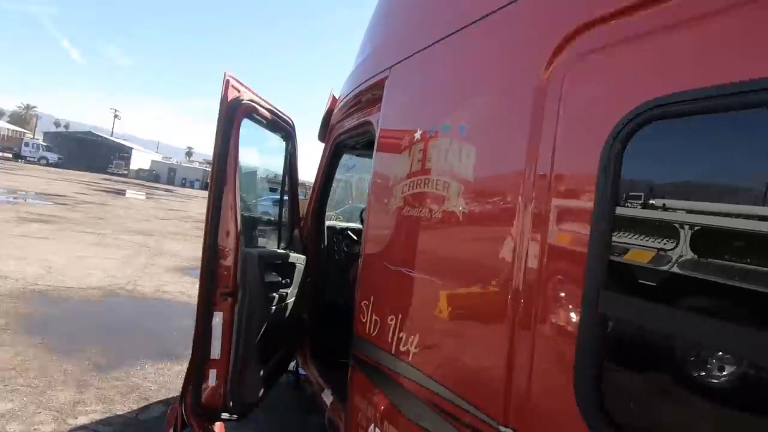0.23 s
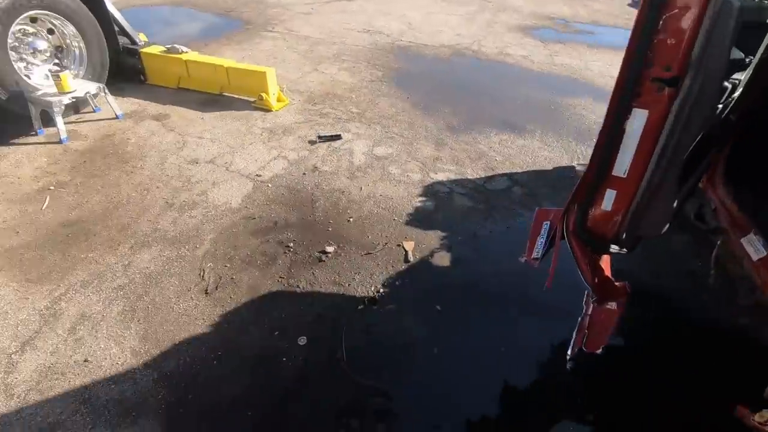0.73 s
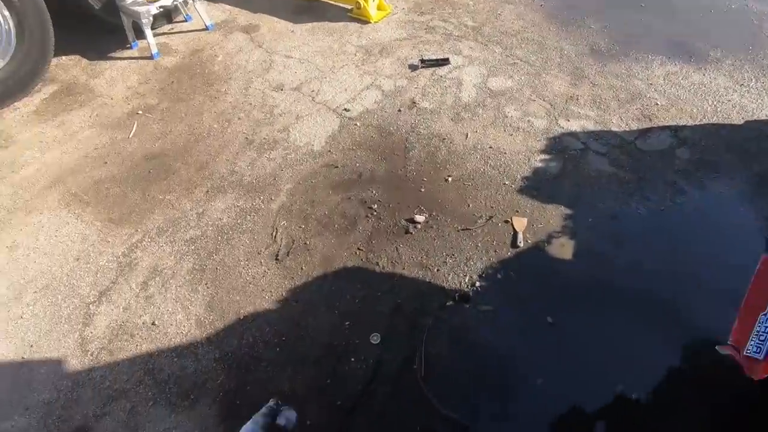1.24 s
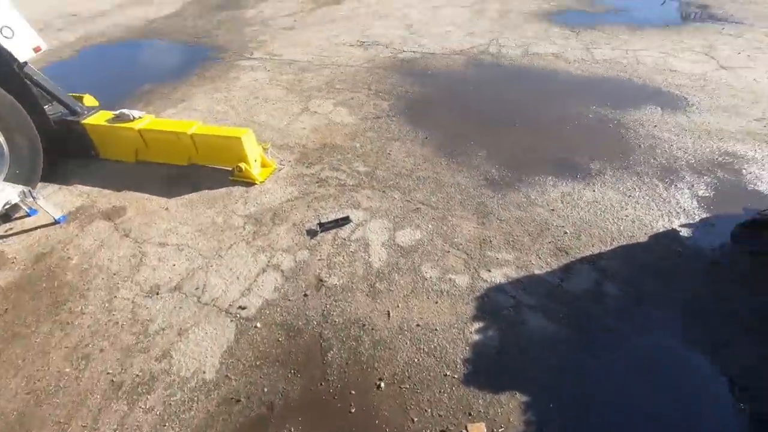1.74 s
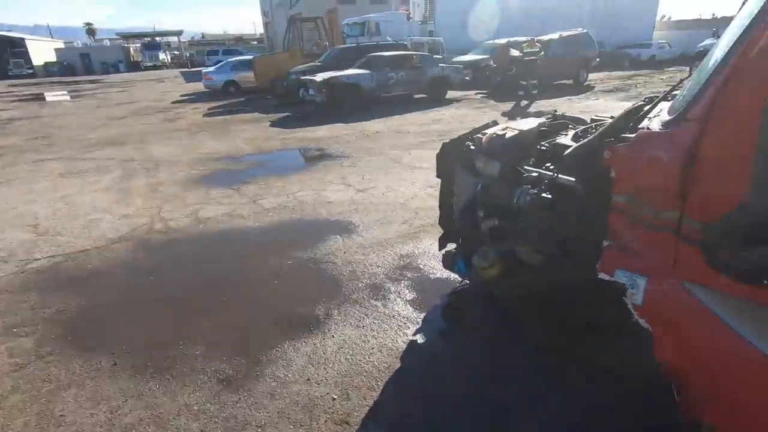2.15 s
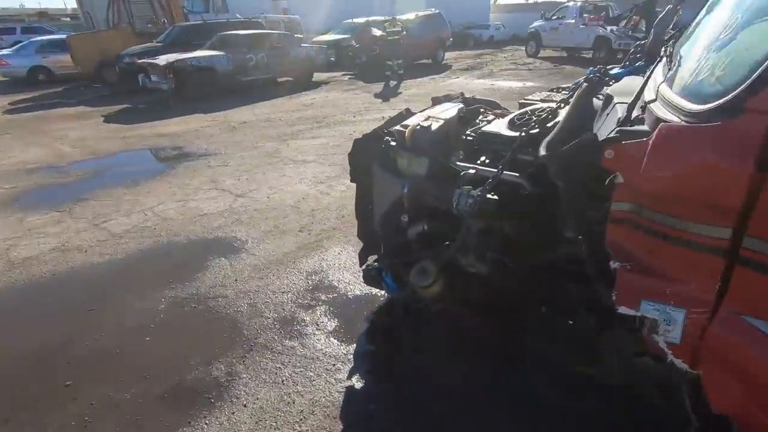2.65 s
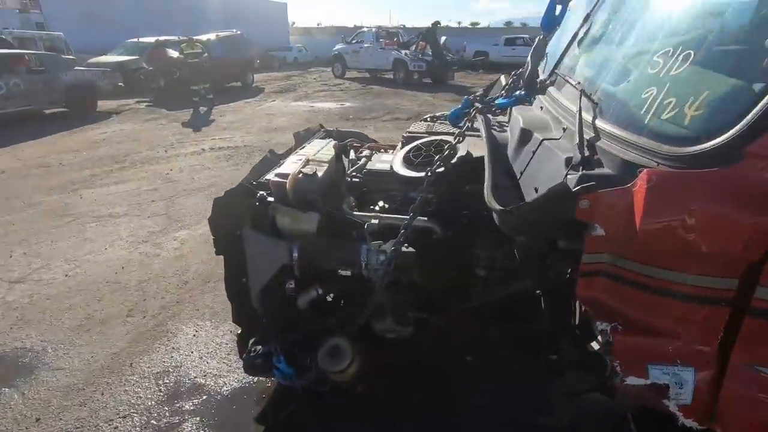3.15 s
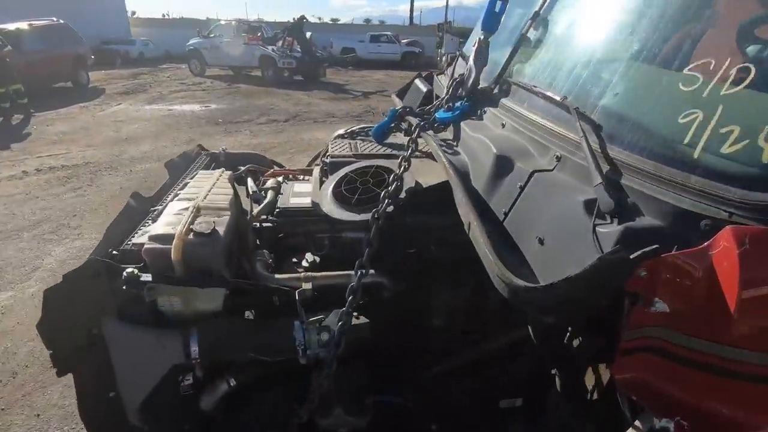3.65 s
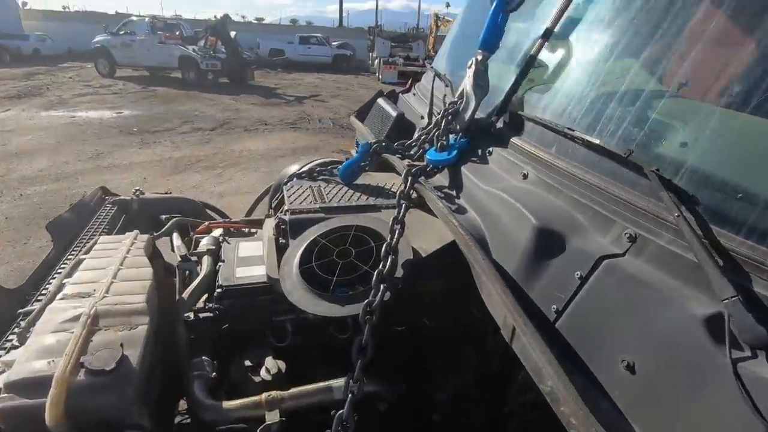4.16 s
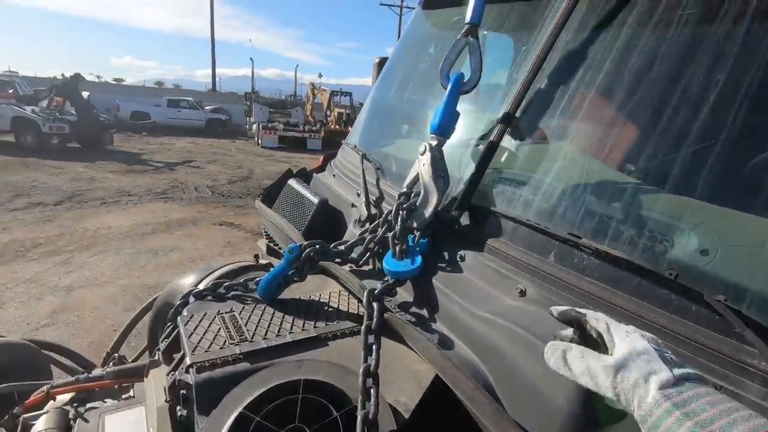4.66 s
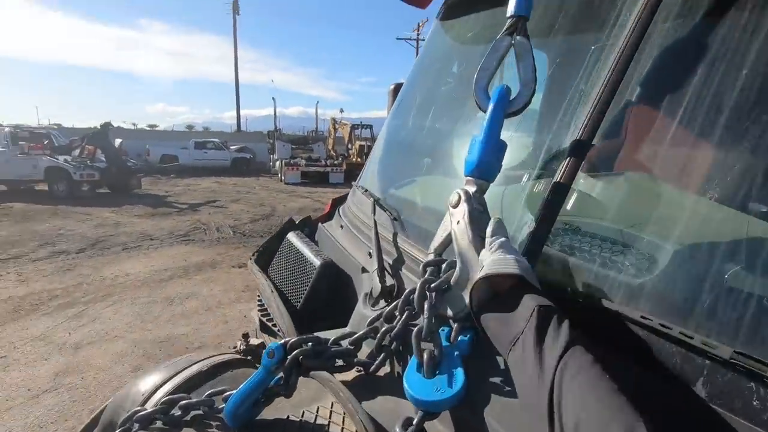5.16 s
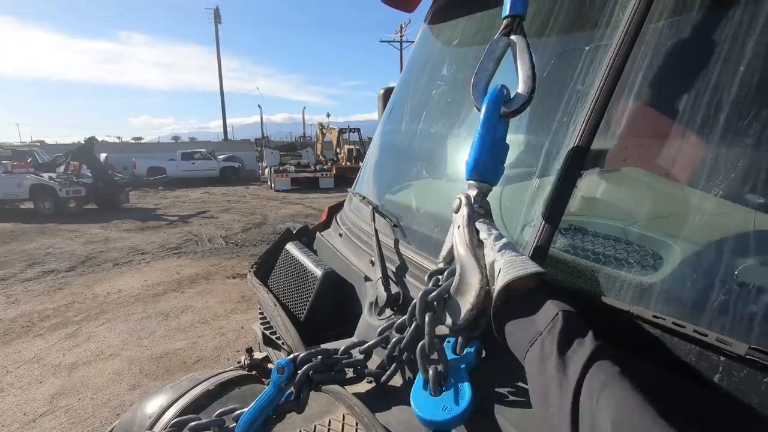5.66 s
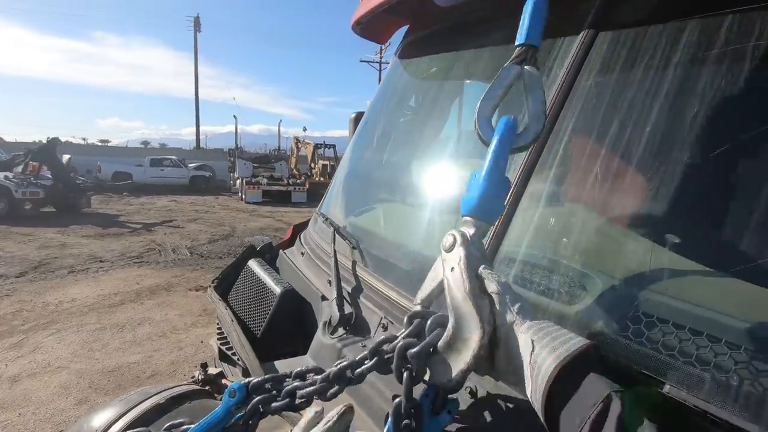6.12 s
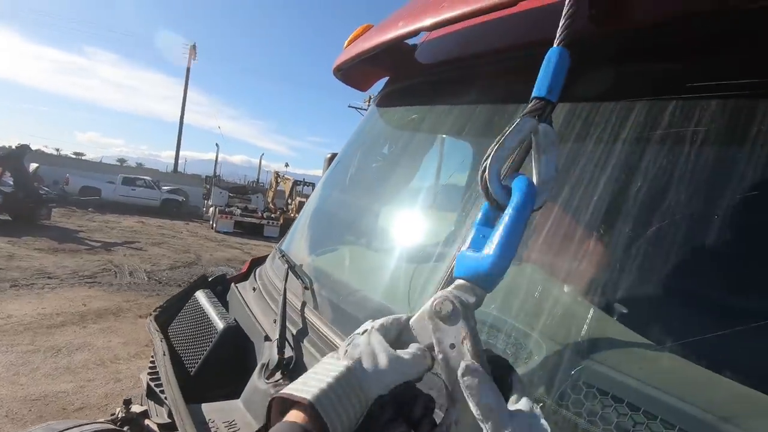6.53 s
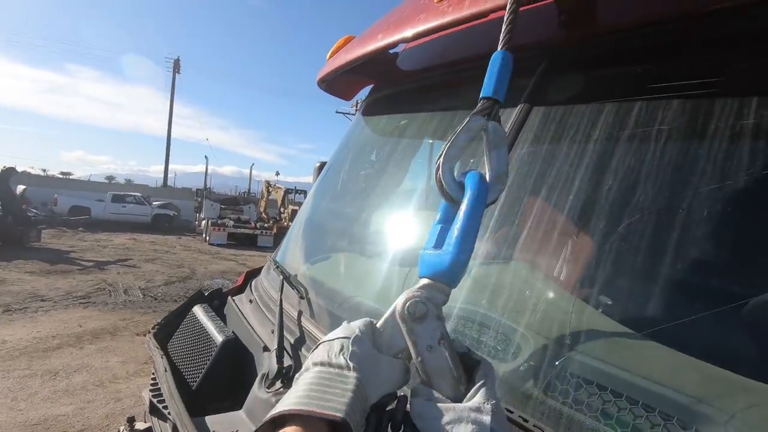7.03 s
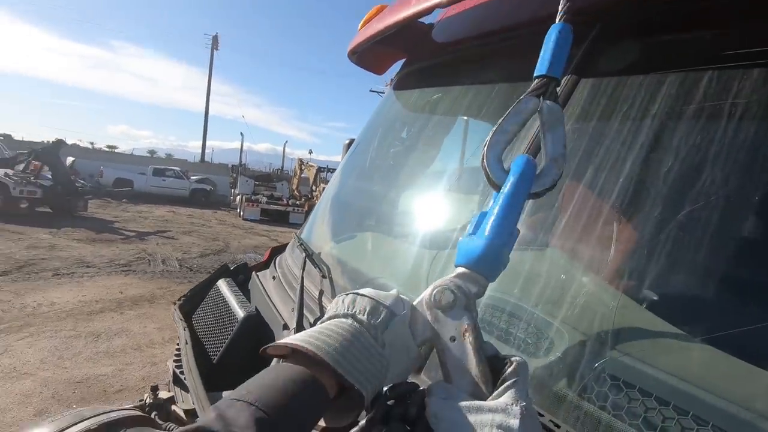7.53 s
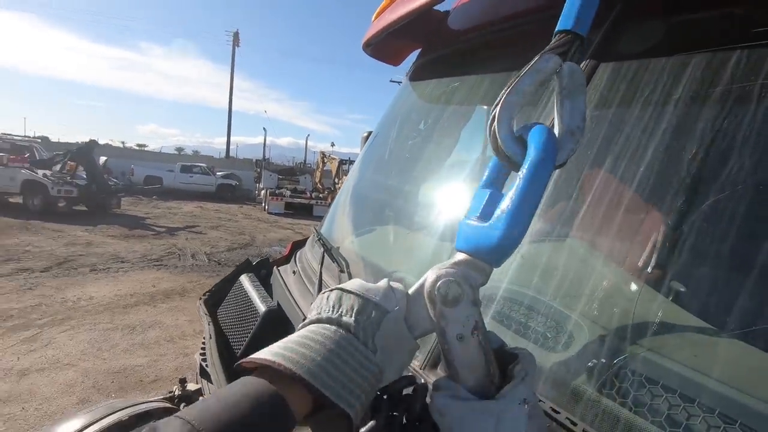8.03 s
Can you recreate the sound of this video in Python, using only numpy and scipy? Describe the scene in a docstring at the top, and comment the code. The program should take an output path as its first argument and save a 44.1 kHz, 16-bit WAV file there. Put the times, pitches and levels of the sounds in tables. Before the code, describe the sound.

A heavy truck diesel idles steadily with a pulsing throb and faint pump whine while chain and hook knock and clink close by in an open yard.

```python
"""A six-cylinder diesel idles in an open yard and drives a hydraulic gear pump: sine orders of the engine
cycle make its throb and whine, noise pulsed by every firing its block roar and fan hiss.
Close by, chain and hook knock and clink as noise bursts, among dull bumps, pops and thin brief tones.
A body-worn camera hears it in stereo, fades to a single duller microphone for a while and fades back.
Wind buffets the microphone ports as lumpy low noise, under faint hiss and noise at the top of the band."""
import sys
import numpy as np
from scipy import signal
from scipy.fft import rfft, irfft, next_fast_len
from scipy.io import wavfile
from scipy.ndimage import uniform_filter1d, map_coordinates

SR = 44100
rng = np.random.default_rng(int(sys.argv[2]) if len(sys.argv) > 2 else 0)


def generate_wav(signal):
    """Clip the signal to [-1, 1] and save it as 16-bit WAV at the path in sys.argv[1]."""
    frames = np.transpose(np.atleast_2d(signal))
    scaled = np.clip(frames, -1, 1) * 32767
    pcm = np.round(scaled).astype(np.int16)
    wavfile.write(sys.argv[1], SR, pcm)


N = 365148

# Exhaust orders. Each row: multiple of the four-stroke cycle, level in dB against the strongest.
EXHAUST_ORDERS = [(9, -16.5), (11, -31), (12, 0), (13, -29), (15, -23), (18, -16.5), (20, -32), (22, -25),
                  (24, -24), (26, -25), (41, -39), (53, -36)]
# Pump and gear whine. Each row: multiple of the cycle, relative level in dB.
WHINE_ORDERS = [(76, -55), (111, -62.5), (118, -51), (120, -50.5), (126, -47), (134, -53.5), (152, -53.5),
                (228, -51.5), (304, -53), (342, -72), (380, -57.5), (386, -69)]
# Strength of each cylinder's firing in dB, in turn.
CYLINDERS_DB = [-6, -6, -3, -5.5, -7.5, -2.5]
# Engine where the wearer stands. Each row: time in seconds, exhaust throb, block roar and fan hiss in dB.
ENGINE_LEVELS = [(0.0, -21.5, -27.5, -45.5), (0.5, -20.5, -25.5, -41.5), (0.62, -20, -26.5, -46),
                 (0.76, -19.5, -26, -47.5), (0.92, -24.5, -29, -49), (1.1, -22.5, -30, -49.5),
                 (1.5, -22.5, -31.5, -46), (2.0, -22, -32, -46.5), (2.5, -22.5, -30, -49),
                 (2.75, -21.5, -31, -50.5), (3.25, -23, -32.5, -51), (3.75, -21, -31.5, -48.5),
                 (4.1, -18.5, -31, -45.5), (4.45, -22, -30.5, -47), (4.75, -17.5, -30, -47.5),
                 (5.0, -22, -32.5, -52.5), (5.5, -18.5, -33, -52), (5.75, -21.5, -32, -50.5),
                 (6.05, -18.5, -30.5, -51.5), (6.3, -26.5, -29.5, -49.5), (6.5, -22, -32.5, -52),
                 (7.0, -21.5, -32.5, -54), (7.7, -20, -31.5, -52), (8.28, -21.5, -30.5, -51)]
# Firing tone where the wearer stands. Each row: time in seconds, level in dB.
FIRING_LEVELS = [(0.0, -21), (0.6, -23.5), (1.3, -28.5), (3.0, -28.5), (3.4, -30), (4.0, -27.5), (5.4, -28),
                 (5.75, -29.5), (6.1, -26.5), (6.3, -34.5), (6.5, -26.5), (7.0, -29), (8.28, -27)]
# Distance from the exhaust beyond that at the start. Each row: time in seconds, distance in metres.
EXTRA_DISTANCE = [(0, 0), (.6, 0), (1.35, -.5), (3, -.3), (3.5, .1), (5.4, .25), (5.75, 1), (7, 1.35),
                  (8.28, 1)]
# Colours of block roar and fan hiss. Each row: frequency in Hz, relative level in dB.
ROAR_COLOUR = [(20, -8.5), (60, 11.5), (120, 4), (170, -3), (250, -6), (330, -10.5), (430, -10),
               (520, -6.5), (620, -3.5), (1000, -8), (1600, -13), (2200, -18), (2900, -24.5), (4000, -35),
               (6000, -59.5)]
HISS_COLOUR = [(1500, -31), (2900, -0.5), (4000, -6.5), (5400, -6), (6600, -4.5), (8000, -9), (9000, -15.5),
               (10000, -25), (11000, -31.5), (12500, -54.5)]
# Bodywork resonances. Each row: centre in Hz, width in Hz, gain in dB.
PANEL_MODES = [(755, 360, 3), (1282, 166, 7), (1984, 340, 5), (5940, 330, 7.5), (7500, 600, 7)]
# Left port against the right for the engine.
# Each row: frequency in Hz, level in dB, phase lead in radians, likeness from 0 to 1.
LEFT_PORT = [(60, -2, -.07, .99), (140, -2.3, -.1, .97), (300, -1.6, -.3, .95), (400, -.5, -.9, .5),
             (470, -4, -2, .2), (600, -10, -3.5, .85), (750, -10.5, -3.7, .97), (1100, -5, -4.05, .96),
             (2100, -8, -4.35, .9), (3500, -4.5, -4.6, .78), (4400, -12, -6, .4), (5300, -9, -8.4, .64),
             (6600, -11.5, -9.1, .7), (8500, -10, -9.1, .55), (10500, -2, -9.2, .3)]
# Extra treble on the left as the wearer turns. Each row: time in seconds, gain in dB.
TURN_TREBLE = [(0.0, 7.5), (0.4, 4), (1.0, 8.5), (3.5, 11), (3.8, 4.5), (4.5, 0.5), (8.28, -1)]

# Colour of the wind on the ports. Each row: frequency in Hz, relative level in dB.
BUFFET_COLOUR = [(15, -18), (30, -12), (55, -9.5), (85, -2.5), (125, 0.5), (170, -15.5), (215, -13.5),
                 (279, -30), (400, -30.5), (520, -72), (880, -120)]
# Gusts at the left port, before colouring. Each row: peak time in seconds, nominal level in dB.
WIND_GUSTS = [(0.42, -39), (0.55, -33), (0.67, -24), (0.9, -46), (1.35, -53), (3.65, -41), (3.87, -42.5),
              (4.42, -47), (4.93, -44), (5.1, -33.5), (5.69, -45), (5.85, -33), (6.49, -26), (6.72, -33),
              (7.42, -45), (7.6, -37.5), (7.75, -33.5), (7.92, -30), (8.25, -25)]

# Colour of the air hiss. Each row: frequency in Hz, relative level in dB.
AIR_HISS_COLOUR = [(5000, -31), (8500, -3.5), (9620, -4.5), (10700, -8.5), (12500, -52), (22000, -120)]
# Colour of the faint noise at 12 to 15 kHz. Each row: frequency in Hz, relative level in dB.
TOP_HISS_COLOUR = [(11000, -30), (12000, -2), (13200, 0), (14500, -3), (15600, -12)]
# Faint noise at 12 to 15 kHz, changing in level. Each row: time in seconds, level in dB.
TOP_HISS_LEVELS = [(0.0, -81.5), (0.5, -69.5), (0.9, -84.5), (1.85, -76), (4.25, -77), (5.4, -91.5),
                   (6.4, -77), (6.75, -83.5), (6.9, -112), (8.28, -112)]

# Dull bumps against the wearer's body. Each row: start in seconds, level in dB before the soft rise, Hz.
BODY_BUMPS = [(0.472, -18.5, 98.3), (0.509, -13.5, 141), (0.527, -9.5, 96.4), (0.54, -13.5, 89.7),
              (0.612, -24, 90), (0.64, -12, 120.4), (0.654, -14.5, 124), (0.671, -14, 128),
              (5.698, -6.5, 103), (6.012, -19, 120), (6.149, -19.5, 98), (6.181, -8, 98.5),
              (6.209, -5.5, 119), (6.295, -16, 97), (6.319, -10, 119.4), (6.342, -13, 109),
              (6.398, -8.5, 100.3), (6.429, -12.5, 102), (6.47, -14.5, 94.4), (6.498, -10, 96.3),
              (6.529, -11.5, 94.4), (6.545, -15, 130), (6.568, -10.5, 127), (6.721, -5, 96.4),
              (8.185, -11.5, 120.5)]
# One bright snap. Each row: start in seconds, relative level in dB, frequency in Hz, 60 dB decay in seconds.
SNAP_PARTIALS = [(.5012, -26, 7800, .004), (.5012, -22, 1400, .005), (.5042, -8, 8200, .003),
                 (.5043, -20, 1000, .006), (.5043, -17, 2000, .005), (.5043, -19, 3000, .004),
                 (.5044, -22, 4200, .004), (.5045, -21, 5300, .003), (.5046, -15, 6500, .003),
                 (.5043, -15, 9600, .003), (.5044, -26, 11000, .003), (.5067, -24, 7800, .012)]
# Thin brief tones. Each row: start in seconds, peak in dB, frequency in Hz.
THIN_TONES = [(4.5844, -43.5, 6400), (5.2644, -46, 6060), (5.77, -43.5, 6260), (5.83, -51, 7000),
              (6.22, -44, 4900), (6.512, -48, 6100), (7.8665, -52, 6500)]
# Sharp pops with a low ring.
# Each row: ring start in seconds, pop peak in dB, pop in Hz, ring level in dB before its rise, ring in Hz.
RINGING_POPS = [(5.575, -21, 504, -43, 301.6), (5.6701, -7.5, 620, -9, 146.6),
                (5.678, -22.5, 520, -24, 496), (5.829, -10, 648, -11, 140.3),
                (6.2675, -19.5, 456, -13, 321), (6.304, -23.5, 500, -26.5, 451),
                (6.373, -18.5, 546, -11, 252), (6.383, -16, 500, -19, 395), (6.394, -21, 600, -21.5, 563),
                (6.498, -27, 497, -24, 444), (6.691, -22, 520, -21, 516), (6.696, -20, 505.4, -23, 329),
                (7.4526, -17, 800, -23, 416), (7.4565, -19.5, 1000, -22, 1040),
                (7.461, -15.5, 600, -32.5, 328), (7.463, -19.5, 750, -27.5, 201),
                (7.472, -20.5, 700, -33, 705), (8.049, -30, 396, -22.5, 319)]
# Very brief faint tones. Each row: start in seconds, level in dB before the rise, 60 dB decay in seconds.
HIGH_BLIPS = [(5.703, -52, 0.054), (5.9745, -50, .012), (5.979, -51, .02)]
# Tones of each blip at 12 and 13 kHz. Each row: frequency in Hz, level in dB against the blip.
BLIP_TONES = [(12000, 0), (13200, -2)]

# Chain and hook contacts, before colouring.
# Each row: start in seconds, then nominal levels of knock, clink and thump in dB.
CHAIN_CONTACTS = [(0.4998, -23, -31.5, -13.5), (0.514, -35.5, -43, -26.5), (0.534, -36.5, -50, -29),
                  (0.566, -25, -54, -33.5), (5.649, -27.5, -56, -26.5), (5.691, -22, -36.5, -33),
                  (5.695, -30, -42, -31.5), (5.704, -37.5, -46, -47), (5.713, -21.5, -40, -34),
                  (5.9722, -41, -31.5, -53.5), (5.9797, -46, -40, -56), (6.189, -28.5, -44, -14),
                  (6.209, -12, -29, -27.5), (6.233, -23.5, -40, -30), (6.238, -24, -43, -28.5),
                  (6.266, -18, -41.5, -25), (6.273, -34, -53, -17.5), (6.299, -27.5, -51, -22),
                  (6.313, -20.5, -36.5, -19.5), (6.334, -20.5, -43, -18.5), (6.342, -22, -47, -24),
                  (6.362, -29.5, -46, -29.5), (6.368, -22, -54, -15.5), (6.393, -17, -31, -18.5),
                  (6.408, -21, -52, -29), (6.448, -18, -36, -28.5), (6.451, -20.5, -38, -29),
                  (6.457, -23, -41.5, -29), (6.474, -20.5, -42, -22), (6.485, -15, -30.5, -29.5),
                  (6.49, -17, -33, -31), (6.494, -21, -43, -32.5), (6.501, -29.5, -50, -25.5),
                  (6.528, -30, -40.5, -22.5), (6.688, -16.5, -31, -29), (6.697, -33, -48, -14),
                  (7.449, -24.5, -44, -30.5), (7.453, -24, -48, -30), (7.46, -27, -56, -26),
                  (7.468, -30, -61.5, -26.5), (8.053, -30, -58, -31.5)]
# Links dragging over each other: start and end in seconds, rise and fall in seconds, mean level in dB.
LINK_SCRAPE = (6.18, 6.52, 0.03, -41.5)
# Colours of knock, clink and thump. Each row: frequency in Hz, relative level in dB.
KNOCK_COLOUR = [(300, -19), (600, -4.5), (1000, -2), (1800, -9), (3000, -20.5), (5000, -35), (9000, -91)]
CLINK_COLOUR = [(1500, -33.5), (3000, 0.5), (5000, -1), (6500, -1.5), (7800, -5), (9000, -15),
                (12000, -25.5), (15000, -46.5)]
THUMP_COLOUR = [(40, -6), (110, 2.5), (190, -2), (300, -9), (600, -16), (1000, -63)]
# Chain link modes. Each row: centre in Hz, width in Hz, level in dB against the direct sound.
LINK_MODES = [(3270, 240, 3), (5120, 290, 2), (6400, 200, 2), (7200, 260, 0.5)]
# Left port against the right for contacts close to the body.
# Each row: frequency in Hz, level in dB, phase lead in radians.
NEAR_LEFT_PORT = [(100, -2, 0), (405, -4, 0.57), (620, -9, -3), (1010, -6, -4.5), (2440, -2.5, -4.5),
                  (5800, -6.5, -8), (12000, -2, -8)]

# Stereo to single microphone: fade start in seconds, stereo return in seconds, both time constants in seconds.
MICROPHONE_SWITCH = (0.63, 3.484, 0.32, 0.47)
# Single microphone response. Each row: frequency in Hz, level in dB, phase lead in radians.
SINGLE_MICROPHONE = [(61, -9, 0.5), (167, -1.5, 1.04), (308, 3, -0.5), (445, 2, -1), (552, -9.5, -0.5),
                     (756, -9, -1.64), (1130, -7.5, -1), (2060, -11, -3), (3000, -13.5, -2),
                     (3600, -15, -5.5), (4480, -3.5, -4.5), (5130, -2, -12), (6536, -14.5, -5),
                     (7700, -20.5, -11.5), (10000, -15.5, -13.5)]

CYCLE_HZ = 5.823  # four-stroke cycle, two crank turns
CRANK_S = 0.01768  # how far into a firing the engine is at the start
PIPE_HZ = 95  # orders above this pipe resonance arrive inverted
WAVER_DB = 1.3  # scale of the firing tone's random wander
BREEZE_DB, GUST_S = -49, 0.064  # mean steady buffeting; gust half-width at 1/e
SHUT_S, OPEN_S = 1.48, 3.55  # low port noise is switched off between these times
AIR_DB = -29.5  # air hiss against the fan hiss
BUMP_T60, RING_CYCLES, THIN_TONE_S = 0.11, 21, 0.027  # s; cycles to fall 60 dB; s
SNAP_LAG_S = 0.00002  # delay at the left port, rounded to a whole sample
KNOCK_T60, CLINK_T60, THUMP_T60 = 0.02, 0.017, 0.06  # s
BLOW_DB, STRIKE_DB = 10.5, 9.5  # first push over the knock and over the clink
CLINK_APART = 0.9  # share of the left clink's power that is its own
TOP_HZ = 15700  # band limit of the camera
T = np.arange(N) / SR


def amp(db):
    """Amplitude ratio of a level in dB."""
    return 10 ** (np.asarray(db) / 20)


def unit(x):
    """x scaled to an rms of one."""
    return x / np.sqrt(np.mean(x ** 2) + 1e-20)


def along(points, hz, column=1):
    """One column of a table by frequency, on a log axis."""
    rows = np.transpose(points)
    return np.interp(np.log(hz + 1), np.log(rows[0] + 1), rows[column])


def curves(rows):
    """One value per sample for each column after the time."""
    s, *cols = np.transpose(rows)
    return [np.interp(T, s, c) for c in cols]


def wobble(rate):
    """A smooth random curve, rate knots a second."""
    coarse = T[::32]
    knots = rng.standard_normal(int(N * rate / SR) + 4)
    return np.interp(T, coarse, map_coordinates(knots, [coarse * rate]))


def filtered(x, response):
    """x times a complex response of frequency."""
    m = next_fast_len(N + SR // 2)
    return irfft(rfft(x, m) * response(np.fft.rfftfreq(m, 1 / SR)), m)[..., :N]


def colour(points):
    """A response of level alone."""
    return lambda hz: amp(along(points, hz))


def port(points):
    """A microphone response: level from shading, phase from delay round the camera body."""
    return lambda hz: amp(along(points, hz)) * np.exp(1j * along(points, hz, column=2))


def order(k, unsteady_db):
    """A sine on one multiple of the cycle, wavering in level and phase and delayed by distance."""
    firings = k / len(CYLINDERS_DB)
    if 2 * firings % 1:
        start = rng.uniform(0, 2 * np.pi)
    else:  # firing orders start in step, half orders a quarter turn late
        start = np.pi * ((k * CYCLE_HZ > PIPE_HZ) - firings % 1)
    crank = T + CRANK_S - curves(EXTRA_DISTANCE)[0] / 343  # speed of sound in m/s
    level = np.sqrt(2) * amp(unsteady_db * wobble(8))
    phase = 2 * np.pi * k * CYCLE_HZ * crank + 0.045 * unsteady_db * wobble(11.0) + start
    return level * np.sin(phase)


def exhaust():
    """The throb: low orders, strongest at twice the firing rate."""
    return sum(amp(db) * order(k, unsteady_db=1.02) for k, db in EXHAUST_ORDERS)


def whine():
    """Tooth-mesh tones of pump and gears that waver more than the exhaust."""
    out = np.zeros(N)
    for k, db in WHINE_ORDERS:
        level = np.sqrt(2) * amp(db + 2.7 * wobble(12))
        out += level * np.sin(2 * np.pi * k * CYCLE_HZ * T + 0.82 * wobble(15))
    return out


def combustion(spectrum, depth, patchy_db):
    """Three unrelated noises in the bodywork, pulsed by every firing."""
    firing = 6 * CYCLE_HZ * T
    index = firing.astype(int)
    uneven_db = 0.53 * rng.standard_normal(index[-1] + 1)[index]
    size = amp(np.array(CYLINDERS_DB)[index % 6] + uneven_db)
    gate = 1 + depth * size * np.exp(-(firing % 1) / 1.4)
    # random patches in time and frequency, common to all three
    z = signal.stft(rng.standard_normal((3, N)), nperseg=512)[2]
    field = rng.standard_normal(z.shape[1:])
    field = uniform_filter1d(uniform_filter1d(field, 5, 0), 8, 1)
    noises = signal.istft(z * amp(patchy_db * unit(field)), nperseg=512)[1][:, :N]

    def bodywork(hz):
        gain_db = sum(db / (1 + (2 * (hz - c) / w) ** 2) for c, w, db in PANEL_MODES)
        return amp(along(spectrum, hz)) * amp(gain_db)

    return unit(filtered(noises * gate, bodywork))


def engine():
    """Left, right and single microphone: each hears the same tones and partly shared noise."""
    throb_db, roar_db, hiss_db = curves(ENGINE_LEVELS)
    turn_db, = curves(TURN_TREBLE)
    firing_db = curves(FIRING_LEVELS)[0] + WAVER_DB * wobble(3.8)
    roar = amp(roar_db) * combustion(ROAR_COLOUR, depth=0.82, patchy_db=1.5)
    hiss = amp(hiss_db) * combustion(HISS_COLOUR, depth=1.0, patchy_db=2.0)
    shared, own, third = roar + hiss
    pitched = amp(firing_db) * order(len(CYLINDERS_DB), unsteady_db=0.8)
    pitched = pitched + amp(throb_db) * exhaust() + amp(roar_db + 31.0) * whine()

    def alike(hz):
        return along(LEFT_PORT, hz, column=3)

    left = filtered(shared, alike) + filtered(own, lambda hz: np.sqrt(1 - alike(hz) ** 2)) + pitched
    upper = filtered(left, lambda hz: hz ** 2 / (hz ** 2 + 800 ** 2))  # turning shades short waves only
    left = filtered(left + (amp(turn_db) - 1) * upper, port(LEFT_PORT))
    apart = 0.97  # rad; cosine = likeness of the single microphone to the right
    single = np.cos(apart) * shared + np.sin(apart) * third + pitched
    return left, shared + pitched, single


def wind():
    """Lumpy rumble, unrelated at the two ports of the pair, swelling in short gusts."""
    gusts = sum(amp(db) * np.exp(-((T - s) / GUST_S) ** 2) for s, db in WIND_GUSTS)
    strength = amp(BREEZE_DB + 2 * wobble(14)) + gusts
    heard = np.clip(np.maximum(SHUT_S - T, T - OPEN_S) / 0.077, 0, 1)
    lumps = amp(2.5 * np.array([wobble(13), wobble(14)]))
    rumble = unit(lumps * filtered(rng.standard_normal((2, N)), colour(BUFFET_COLOUR)))
    return heard * strength * amp([[0], [4]]) * rumble  # right port 4 dB stronger


def stereo_share():
    """1 while the pair is heard, falling towards 0 while the single microphone is."""
    off, on, fade_out, fade_in = MICROPHONE_SWITCH
    leaving = np.exp(-(np.clip(T - off, 0, None) / fade_out) ** 1.19)
    returning = 1 - np.exp(-np.abs(T - on) / fade_in)
    return np.where(T < on, leaving, returning)


def air():
    """Hiss that follows the fan and needs the pair, and faint noise at 12 to 15 kHz, changing in level."""
    hiss = unit(filtered(rng.standard_normal((2, N)), colour(AIR_HISS_COLOUR)))
    top = unit(filtered(rng.standard_normal((2, N)), colour(TOP_HISS_COLOUR)))
    hiss_level = amp(curves(ENGINE_LEVELS)[2] + AIR_DB) * stereo_share()
    return hiss_level * hiss + amp(curves(TOP_HISS_LEVELS)[0]) * top


def tones(rows, shape):
    """Short sines under an envelope of time and duration."""
    out, t = np.zeros(N + SR), np.arange(SR // 4) / SR
    for s, db, hz, length in rows:
        out[round(s * SR):][:len(t)] += amp(db) * shape(t, length) * np.sin(2 * np.pi * hz * t)
    return out[:N]


def dying(t, t60):
    """A soft rise and an exponential fall."""
    return amp(-60 * t / t60) * (1 - np.exp(-20 * t / t60))


def struck(t, t60):
    """A quicker rise and an exponential fall."""
    return amp(-60 * t / t60) * (1 - np.exp(-55 * t / t60))


def arch(t, length):
    """Half a sine, zero at both ends."""
    return np.sin(np.pi * np.clip(t / length, 0, 1))


def bumps_and_brief_tones():
    """Low bumps, a snap, pops of about one and a half cycles with rings, high blips and thin tones."""
    bumps = tones([(*row, BUMP_T60) for row in BODY_BUMPS], dying)
    snap = tones(SNAP_PARTIALS, dying)
    thin = tones([(*row, THIN_TONE_S) for row in THIN_TONES], arch)
    # each pop starts one of its cycles before the ring
    pops = tones([(s - 1 / hz, db, hz, 1.48 / hz) for s, db, hz, _, _ in RINGING_POPS], arch)
    rings = tones([(s, db, hz, RING_CYCLES / hz) for s, _, _, db, hz in RINGING_POPS], struck)
    blip_rows = [(s, db + tone_db, hz, t60) for s, db, t60 in HIGH_BLIPS for hz, tone_db in BLIP_TONES]
    shaded = bumps + pops + rings + tones(blip_rows, dying) + thin
    snap_pair = np.array([np.roll(snap, round(SNAP_LAG_S * SR)), snap])
    return np.array([filtered(shaded, port(NEAR_LEFT_PORT)), shaded]) + amp([[3], [5.5]]) * snap_pair


def puffs(envelope, spectrum, pushes=0):
    """Noise under an envelope, with any pushes, through a colour of unit rms gain."""
    return filtered(envelope * rng.standard_normal(N) + pushes, lambda hz: unit(amp(along(spectrum, hz))))


def decays(times, peaks_db, t60):
    """An envelope of quick rises and exponential falls."""
    envelope, t = np.zeros(N + SR), np.arange(SR // 4) / SR
    for s, db in zip(times, peaks_db):
        envelope[round(s * SR):][:len(t)] += amp(db - 60 * t / t60) * (1 - np.exp(-t / 0.001))
    return envelope[:N]


def blows(times, peaks_db):
    """One single-sample push at each time."""
    out = np.zeros(N)
    out[np.round(times * SR).astype(int)] = amp(peaks_db)
    return out


def chain():
    """Each contact knocks, clinks and thumps; the two ports share only part of the clink."""
    s, knock_db, clink_db, thump_db = np.transpose(CHAIN_CONTACTS)
    start, end, edge, drag_db = LINK_SCRAPE
    drag = np.clip(np.minimum(T - start, end - T) / edge, 0, 1) * amp(drag_db + 3.6 * wobble(90))
    knock_pushes = blows(s + .001, knock_db + BLOW_DB)
    knocks = puffs(decays(s, knock_db, KNOCK_T60) + drag, KNOCK_COLOUR, knock_pushes)
    thumps = puffs(decays(s, thump_db, THUMP_T60) + amp(9.5) * drag, THUMP_COLOUR)
    body = knocks + thumps

    def links(f):
        return 1 + sum(amp(db) * 1j * f * w / (c * c - f * f + 1j * f * w) for c, w, db in LINK_MODES)

    envelope = decays(s, clink_db, CLINK_T60) + amp(-13.5) * drag
    strikes = blows(s + .0005, clink_db + STRIKE_DB)
    clink = filtered(puffs(envelope, CLINK_COLOUR, strikes), links)
    own = filtered(puffs(envelope, CLINK_COLOUR, strikes), links)
    left = body + np.sqrt(1 - CLINK_APART) * clink + np.sqrt(CLINK_APART) * own
    return np.array([filtered(left, port(NEAR_LEFT_PORT)), body + clink])


def camera(pair, third):
    """Cross-fade between the stereo pair and the single microphone."""
    wide = stereo_share()
    return wide * pair + (1 - wide) * filtered(third, port(SINGLE_MICROPHONE))


def scene():
    """Engine and close contacts through the camera's microphones, then wind and air at the ports."""
    left, right, third = engine()
    near = chain() + bumps_and_brief_tones()
    return camera(np.array([left, right]) + near, third + near[1]) + wind() + air()


def record(dry):
    """The camera keeps nothing above its band limit."""
    return filtered(dry, lambda hz: hz < TOP_HZ)


dry = scene()
out = record(dry)
generate_wav(out)
```